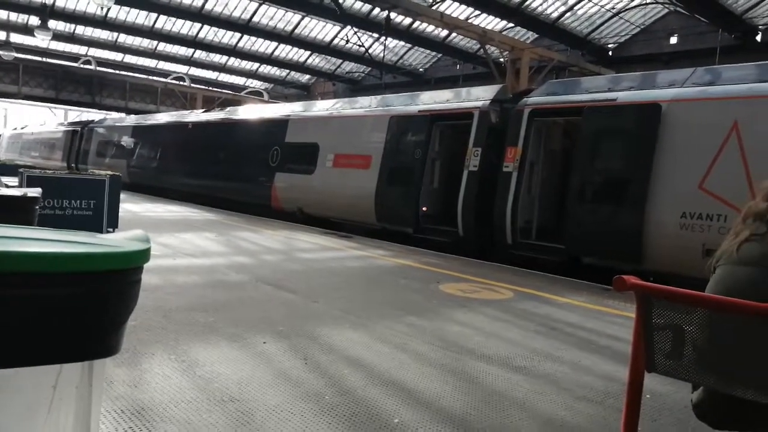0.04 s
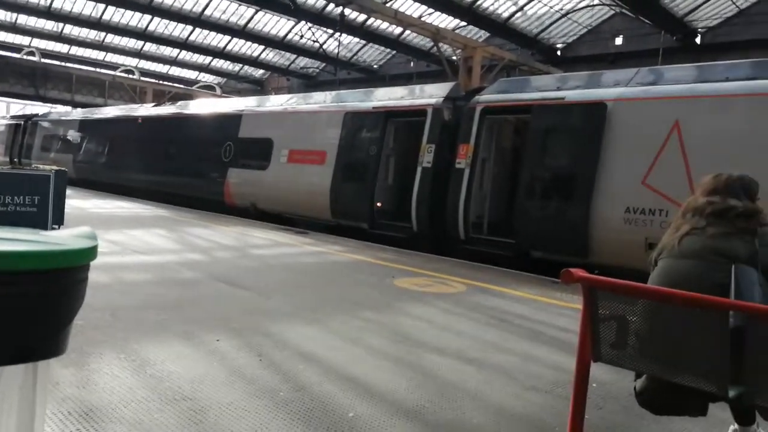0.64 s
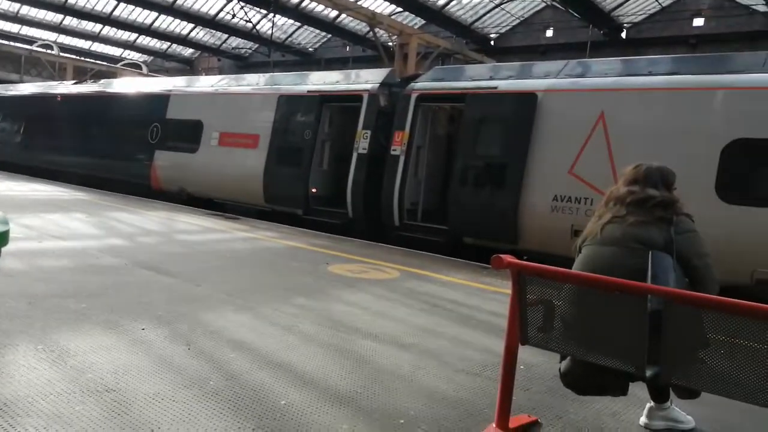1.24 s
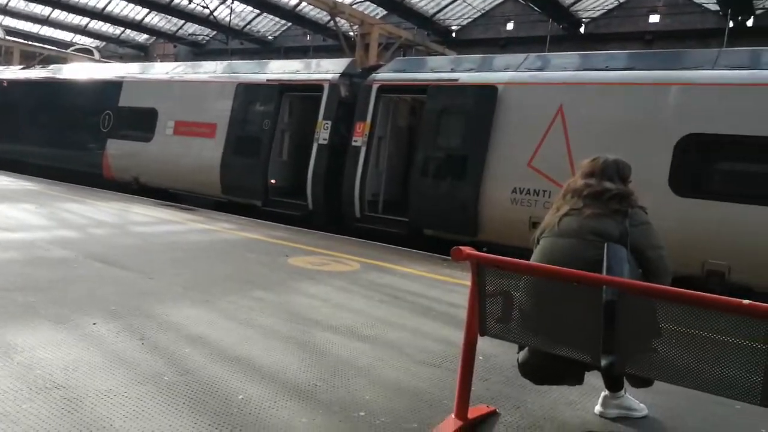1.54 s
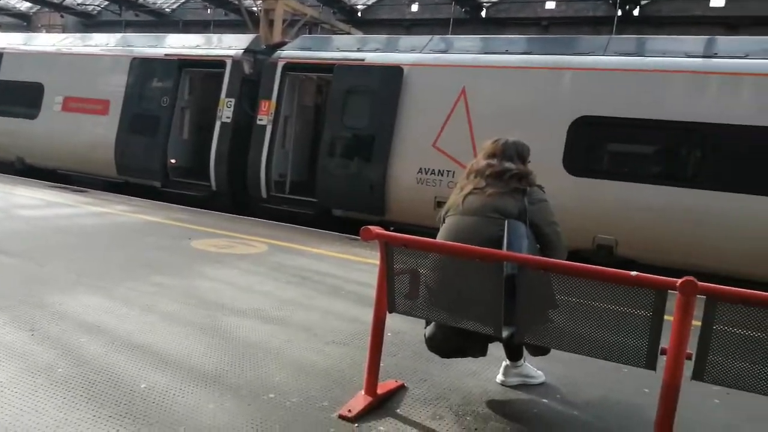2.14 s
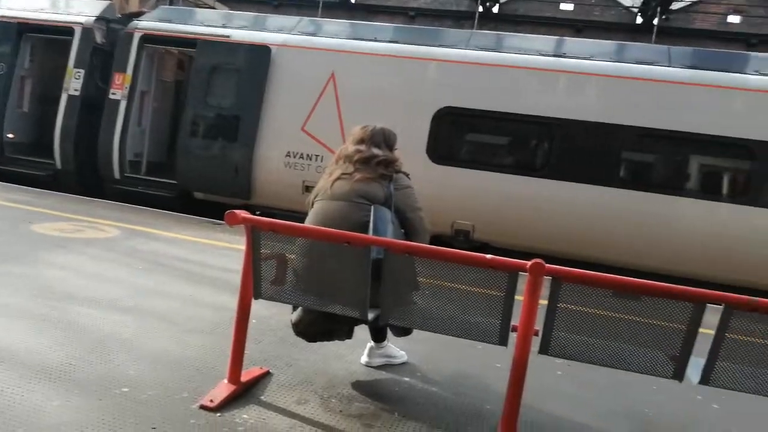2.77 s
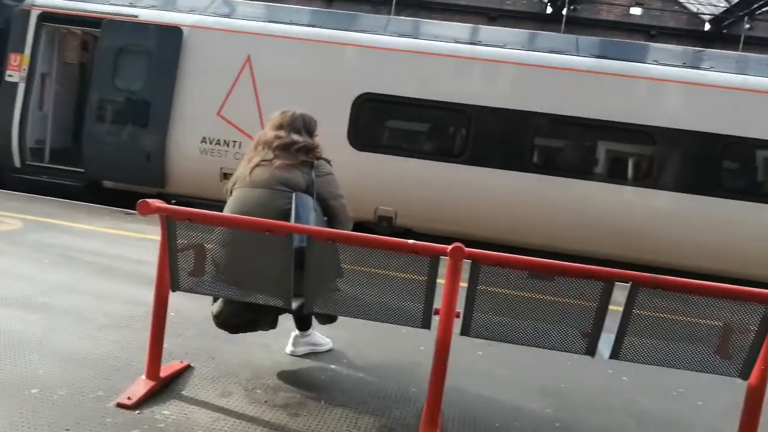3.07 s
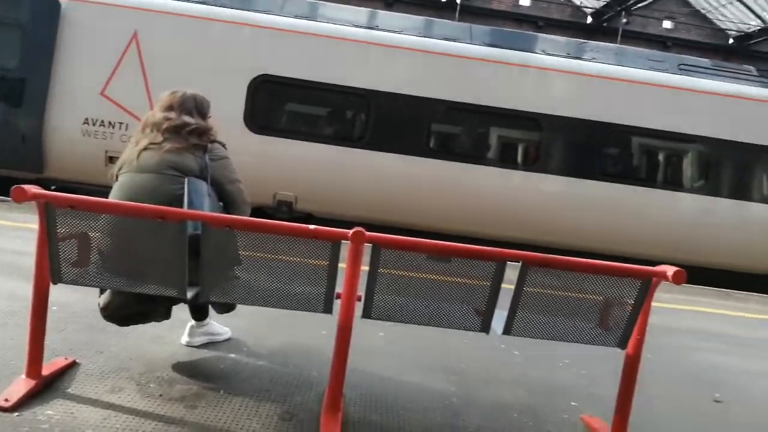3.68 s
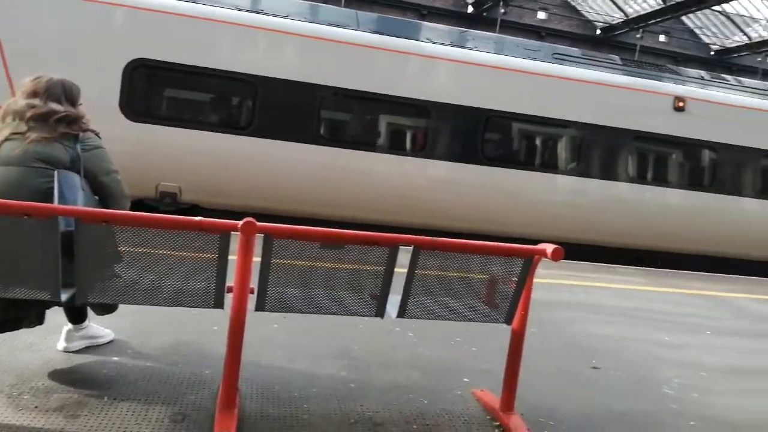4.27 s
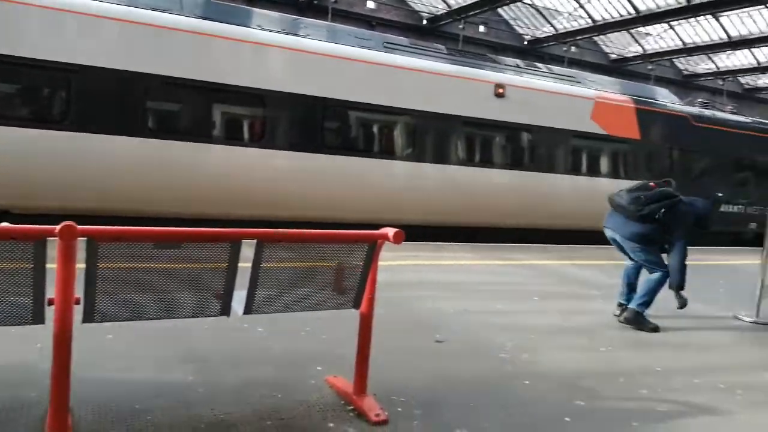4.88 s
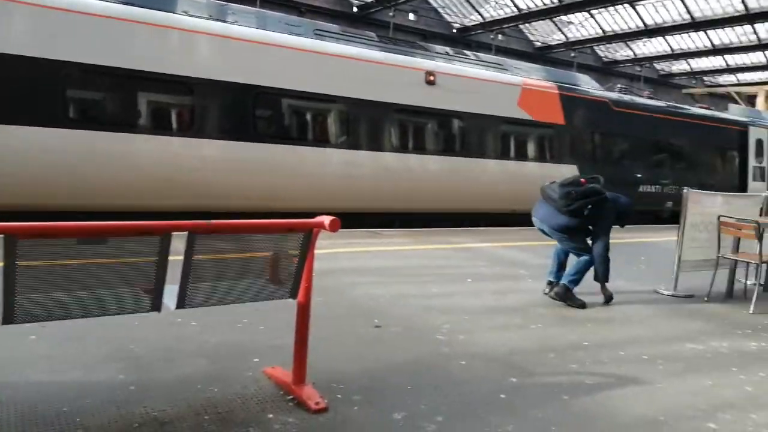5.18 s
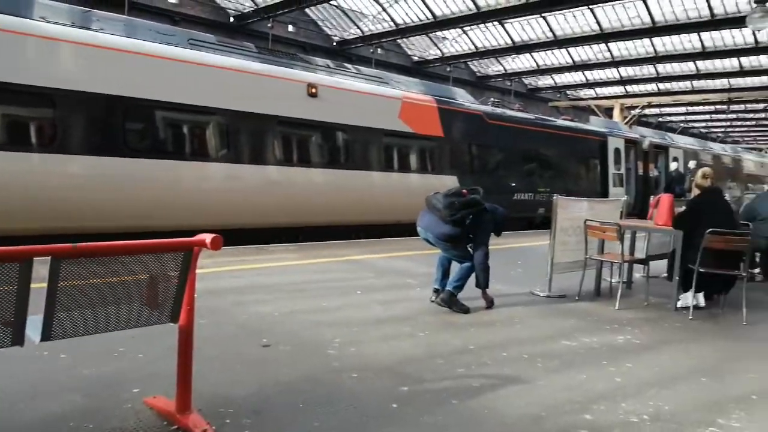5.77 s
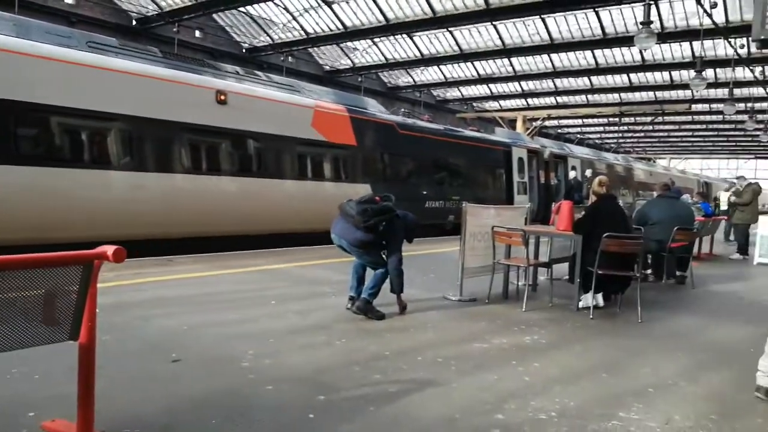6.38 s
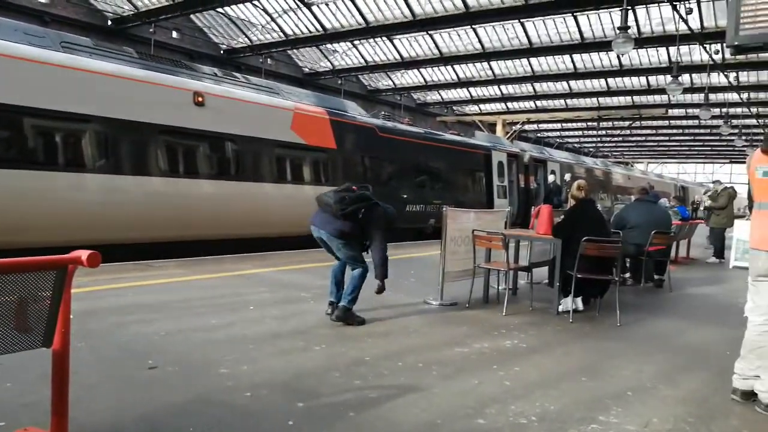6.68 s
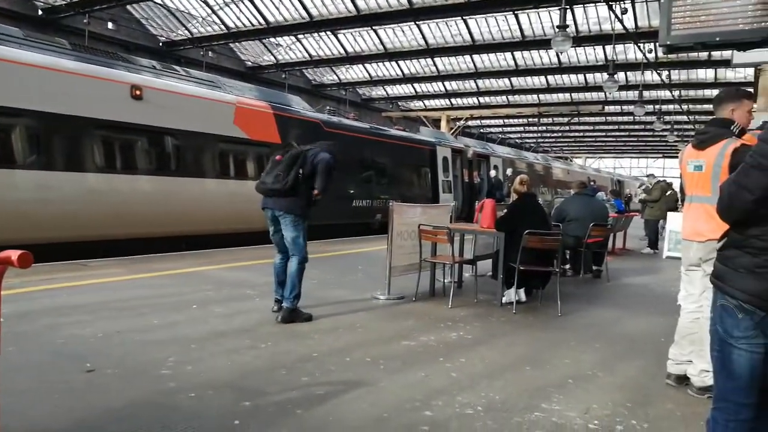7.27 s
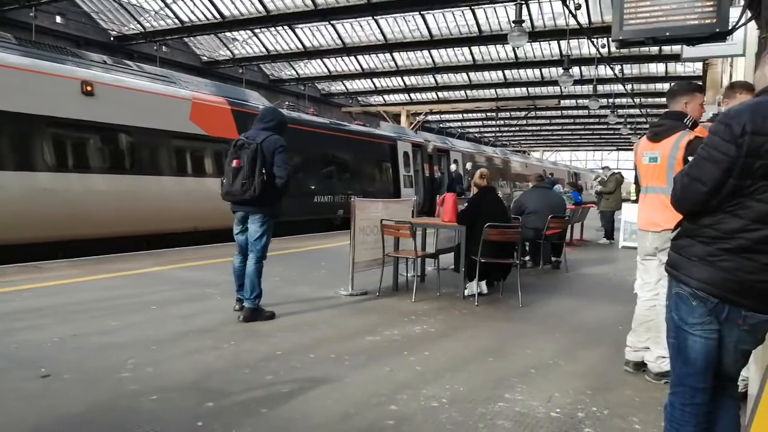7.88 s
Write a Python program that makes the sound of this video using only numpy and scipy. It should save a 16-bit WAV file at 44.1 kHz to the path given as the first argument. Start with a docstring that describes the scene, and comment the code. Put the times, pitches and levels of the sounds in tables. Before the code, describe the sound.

Diesel engines of a passenger train hum and throb beside a station platform, over a faint hiss, after a short opening whistle.

```python
"""Six-cylinder diesel engines idle under a passenger train while the listener walks along the platform.
Unequal firings sound harmonics of the engine cycle, which beat into a throb and swell and fade in the
standing waves under a glass station roof. Valves and injectors excite clatter, rumble and casing modes.
Turbulent air rushes from fans and hisses under the coach. A whistle blast dies away in the hall,
and faint squeals, hollow swells and light ticks come and go."""
import sys
import numpy as np
from scipy import signal
from scipy.fft import rfft, irfft, next_fast_len
from scipy.io import wavfile
from scipy.ndimage import uniform_filter1d

SR = 44100
rng = np.random.default_rng(int(sys.argv[2]) if len(sys.argv) > 2 else 0)


def bounce(signal):
    """Save signal as a 16-bit WAV file at the path given by the first command-line argument."""
    frames = np.transpose(np.atleast_2d(signal))
    limited = np.clip(frames, -1, 1)
    pcm = np.round(limited * 32767).astype(np.int16)
    wavfile.write(sys.argv[1], SR, pcm)


N = 358577
TIME = np.arange(N) / SR
CYCLE_HZ, CYLINDERS = 8.302, 6   # four-stroke cycle; an "order" is a multiple of its rate
# swell of the exhaust drone, which the rumble follows: (time [s], level [dB])
DRONE_SWELL = [(0, -49), (.6, -37.5), (1.05, -45), (1.45, -37.5), (2.0, -43), (3.1, -38.5), (3.52, -46),
               (3.92, -33.5), (4.33, -42), (4.89, -35.5), (5.37, -48.5), (5.84, -37.5), (6.4, -37.5),
               (7.05, -47.5), (7.35, -38.5), (7.8, -36), (8.13, -43.5)]


def from_db(db):
    """Amplitude grows tenfold for every 20 dB."""
    return 10 ** (np.asarray(db) / 20)


def rms_one(x):
    """Normalisation to unit mean power."""
    return x / np.sqrt(np.mean(np.abs(x) ** 2) + 1e-20)


def in_time(curve):
    """Linear interpolation of (time, level) points at every sample."""
    return np.interp(TIME, *np.transpose(curve))


def drift(rate_hz):
    """Low-passed noise: a smooth random fluctuation of rms 1."""
    hop, settle = 100, 2000
    pole = np.exp(-2 * np.pi * rate_hz * hop / SR)
    noise = rng.standard_normal(N // hop + settle + 2)
    slow = signal.lfilter([1], [1, -2 * pole, pole * pole], noise)[settle:]
    return np.interp(np.arange(N) / hop, np.arange(len(slow)), rms_one(slow))


def colour(x, spectrum):
    """Spectral shaping, with a roll-off below the lowest given frequency; rms 1."""
    size = next_fast_len(N)
    hz, db = np.transpose(spectrum)
    bins = np.maximum(np.arange(size // 2 + 1) * SR / size, 1)
    gain = from_db(np.interp(np.log(bins), np.log(hz), db)) * np.minimum(bins / hz[0], 1) ** 2
    return rms_one(irfft(rfft(x, size) * gain, size)[:N])


def resonate(x, hz, width):
    """Resonance as a steep-sided pass band; rms 1."""
    edges = [max(hz - width / 2, 10), hz + width / 2]
    return rms_one(signal.sosfilt(signal.butter(2, edges, "band", fs=SR, output="sos"), x))


def blend(coherent, diffuse, share):
    """Uncorrelated sounds add in power; share is the diffuse fraction."""
    return np.sqrt(1 - share) * coherent + np.sqrt(share) * diffuse


def passing(machines, far_db):
    """Inverse-square law: the level [dB] of machines walked past, over that of the distant ones."""
    power = sum(from_db(db) ** 2 / (1 + ((TIME - s) / reach) ** 2) for s, db, reach in machines)
    return 10 * np.log10(power + from_db(far_db) ** 2)


def ringing(events, rise_s, evenness=0.16):
    """Reverberant decay: narrow noise bands swell, then die away exponentially."""
    out = np.zeros(N)
    for s, hz, width, db, t60 in events:
        age = TIME - s
        envelope = np.exp(-(np.minimum(age, 0) / rise_s) ** 2 - np.log(1000) * np.maximum(age, 0) / t60)
        band = resonate(rng.standard_normal(N + SR), hz, width)
        strength = np.sqrt(np.abs(uniform_filter1d(band ** 2, round(2 * SR / width))) + 1e-9)
        steadier = rms_one(band / strength ** evenness)[SR:]
        out += from_db(db) * envelope * steadier
    return out


def distant_sounds():
    """Reverberation prolongs a two-note whistle and its echo, faint squeals and hollow swells."""
    # narrow-band events: (time [s], frequency [Hz], bandwidth [Hz], level [dB], 60 dB decay time [s])
    whistle = [(0.0063, 2430, 63, -33, 0.27), (0.12, 2420, 130, -42, .8), (0.22, 2430, 70, -45, .7),
               (0.0, 2190, 110, -41.5, 1.1)]
    squeals = [(2.67, 2900, 70, -47.5, .45), (3.89, 2720, 110, -50, 0.36), (4.8, 2830, 55.4, -45, .4),
               (5.75, 2835, 55, -50, 2.5), (7.4, 2845, 65, -44.5, .8)]
    swells = [(.72, 634, 170, -37, 0.78), (1.65, 430, 14, -42.5, 1.4), (2.06, 431, 13, -44.5, 0.74),
              (2.78, 885, 270, -42.5, 1), (3.06, 547, 75, -38.5, 0.85), (3.58, 930, 320, -39.5, 0.5),
              (4.5, 470, 180, -42, 1.3), (6.04, 580, 100, -39, 0.61)]
    return ringing(whistle, rise_s=.02) + ringing(squeals, rise_s=.05) + ringing(swells, rise_s=.08)


def ticks(t60_s=0.021):
    """Brief hard contacts have broad spectra: bright bursts that die at once."""
    # contacts on the platform: (time [s], relative level [dB])
    contacts = [(0.4194, -46), (0.8305, -31), (1.5494, -46), (4.4994, -43)]
    envelope = sum(from_db(db - 6.5) * (TIME >= s) * np.exp(-np.log(1000) * np.abs(TIME - s) / t60_s)
                   for s, db in contacts)
    return envelope * resonate(rng.standard_normal(N), hz=6400, width=2700)


def air(spectrum, level_db, flutter_db):
    """Turbulence radiates broadband noise whose level flutters."""
    return from_db(level_db + flutter_db * drift(19)) * colour(rng.standard_normal(N), spectrum)


def hiss():
    """Fine turbulence in the air under the coach radiates high frequencies."""
    # hiss spectrum: (frequency [Hz], relative density [dB])
    spectrum = [(2500, -21), (4000, -7), (4500, 4), (4800, 6), (5250, 8), (5700, 4), (6600, 2.5),
                (7500, -9.5)]
    # its strength along the walk: (time [s], relative level [dB])
    strength = [(0, -50.5), (1.1, -51), (1.8, -54), (2.7, -50), (3.8, -52), (4.4, -58.5), (8.13, -59)]
    return air(spectrum, in_time(strength) - .5, flutter_db=0.73)


def fans():
    """Turbulent fan noise rises and falls with the listener's distance."""
    # fan spectrum: (frequency [Hz], relative density [dB])
    spectrum = [(400, 4), (900, -2), (1500, 7), (1900, 1), (2100, 3.5), (2700, -1.5), (3300, -15.5),
                (3600, -14.5), (4000, -38.5), (5200, -7.5), (6000, -20), (7500, -9)]
    # fans passed: (time when closest [s], relative level [dB], time to half power [s])
    passes = [(0.3, -57, .9), (6.15, -52.5, .45), (7.7, -52.5, .6)]
    return air(spectrum, passing(passes, far_db=-57) + 8.5, flutter_db=1.03)


def knocks(cycles, irregular, pulsing, change_hz=0.38, beat_order=4):
    """Cyclic excitation: valve and injector noise partly repeats each cycle and pulses with the firings."""
    size = round(SR / CYCLE_HZ)
    place = np.round(cycles * size).astype(int) % size
    patterns = rng.standard_normal((6, size))
    paths = np.array([drift(change_hz) for _ in patterns])
    # transmission paths trade strength while their total power stays even
    repeating = np.sum(paths * patterns[:, place], axis=0) / np.linalg.norm(paths, axis=0)
    firing = np.cos(2 * np.pi * CYLINDERS * cycles) + np.cos(2 * np.pi * beat_order * cycles)
    return blend(repeating, rng.standard_normal(N), irregular) * (1 + pulsing * firing / 2)


def casing(cycles):
    """Panel resonance: knocks ring the engine casing, which grows louder as the listener nears it."""
    # panel modes: (frequency [Hz], bandwidth [Hz], relative level [dB])
    modes = [(1642, 113, -49), (1722, 46, -53.5), (2955, 140, -53), (3139, 330, -52)]
    panels = np.zeros(N)
    for hz, width, db in modes:
        wavering = from_db(db + drift(6))
        panels += wavering * resonate(knocks(cycles, irregular=0.89, pulsing=0.13), hz, width)
    return from_db(-0.84 + 0.1864 * TIME) * panels


def rumble(cycles, mean_db=-35.1, drone_share=0.33):
    """Forced response: the knocks raise a low rumble in the hall that swells with the drone."""
    # rumble spectrum: (frequency [Hz], relative density [dB])
    spectrum = [(15, -24), (24, -12), (33, 1.5), (50, 12), (70, -2), (120, 2), (200, 2), (300, -3),
                (480, -5), (700, -14), (1200, -34.5)]
    drone_db = in_time(DRONE_SWELL)
    level_db = mean_db + drone_share * (drone_db - drone_db.mean())
    return from_db(level_db) * colour(knocks(cycles, irregular=0.78, pulsing=0.11), spectrum)


def clatter(cycles):
    """Structure-borne sound: each engine block radiates its knocks, loudest when closest."""
    # block spectrum: (frequency [Hz], relative density [dB])
    spectrum = [(150, -18.5), (300, -7), (480, -5), (700, -0.5), (860, 1.5), (1000, -2.5), (1200, -7),
                (1450, -17), (1900, -28), (3000, -14), (3800, -40), (7500, -31)]
    # engines passed: (time when closest [s], relative level [dB], time to half power [s])
    passes = [(0.2, -44.5, 0.17), (2.85, -44.5, 0.38), (3.85, -43, 1)]
    excitation = knocks(cycles, irregular=0.64, pulsing=0.12, change_hz=1.18)
    return from_db(passing(passes, far_db=-42) + 1.2) * colour(excitation, spectrum)


def harmonic(cycles, order, scattered=0, pipe_dispersion=.245, sway_rad=.022, fade_hz=.022):
    """Multipath fading of a tone delayed by the pipe: walking shifts and fades short waves fastest."""
    phase = 2 * np.pi * (order * cycles - pipe_dispersion * (order - CYLINDERS) ** 2)
    phase += sway_rad * order * drift(0.78)
    diffuse = drift(fade_hz * order) * np.cos(phase) + drift(fade_hz * order) * np.sin(phase)
    return blend(np.sqrt(2) * np.cos(phase), diffuse, scattered)


def whine(cycles, peak_hz=856, half_width_hz=38, peak_db=-50.5):
    """A resonance of the block lifts the harmonics that lie near its peak."""
    # every third harmonic around the resonance: (order)
    orders = (96, 99, 102, 105, 108)
    out = np.zeros(N)
    for order in orders:
        detuning = (order * CYCLE_HZ - peak_hz) / half_width_hz
        out += from_db(peak_db) / np.hypot(1, detuning) * harmonic(cycles, order, scattered=0.73)
    return out


def exhaust(cycles):
    """Beating: unequal cylinders sound harmonics of the cycle rate, and neighbours interfere as a throb."""
    # swells of the firing tone and of its third harmonic: (time [s], level [dB])
    boom = [(0.0, -32.5), (0.13, -30), (1.31, -22.5), (2.51, -27.5), (2.87, -42), (5.37, -28.5),
            (6.14, -31.5), (7.27, -27.5), (8.13, -34.5)]
    hum = [(0, -49.5), (1.05, -47.5), (1.38, -32.5), (1.8, -35.5), (2.4, -55), (2.7, -39.5), (3.35, -40),
           (3.85, -34.5), (4.45, -35), (5.5, -42.5), (6.4, -35), (7.0, -42.5), (8.13, -53)]
    # steady tones: (order, level [dB], scattered share [0-1])
    steady_tones = [(3, -55.5, .1), (5, -34.5, 0.15), (7, -54, 0.4), (8, -56, 0.8), (9, -39, 0.21),
                    (10, -44, .05), (12, -43.5, 0), (13, -52.5, 0.2), (15, -50.5, .15), (44, -56, 0.7)]
    # standing waves: (order, direct level [dB], antinode time [s], antinode spacing [s], reflection [0-1])
    standing_waves = [(4, -32.5, 3.6, 3.75, .15), (14, -41.5, 3.3, 2.25, 0.3)]
    # drone tones: (order, level relative to the swell [dB], scattered share [0-1])
    drone_tones = [(21, -9.5, .3), (22, -10.5, .3), (23, -11, 0.2), (24, -5.5, .3), (28, -5.5, .1),
                   (38, -6.5, 0.12)]
    out = from_db(in_time(boom)) * harmonic(cycles, CYLINDERS)
    out += from_db(in_time(hum)) * harmonic(cycles, 3 * CYLINDERS)
    for order, db, scattered in steady_tones:
        out += from_db(db) * harmonic(cycles, order, scattered)
    for order, db, antinode, spacing, reflection in standing_waves:
        interference = np.abs(1 + reflection * np.exp(2j * np.pi * (TIME - antinode) / spacing))
        out += from_db(db) * interference * harmonic(cycles, order)
    for order, db, scattered in drone_tones:
        out += from_db(in_time(DRONE_SWELL) + db) * harmonic(cycles, order, scattered)
    return out


def scene():
    """Superposition: engines, fans, air and station sounds add at one listening point."""
    cycles = CYCLE_HZ * (TIME - .0815)
    diesel = exhaust(cycles) + whine(cycles) + clatter(cycles) + rumble(cycles) + casing(cycles)
    return (diesel + fans() + hiss() + distant_sounds() + ticks())[None]


def record(dry, cutoff_hz=7900):
    """A steep low-pass filter removes the treble above the cut-off."""
    return signal.sosfilt(signal.cheby2(16, 60, cutoff_hz, fs=SR, output="sos"), dry)


dry = scene()
out = record(dry)
bounce(out)
```